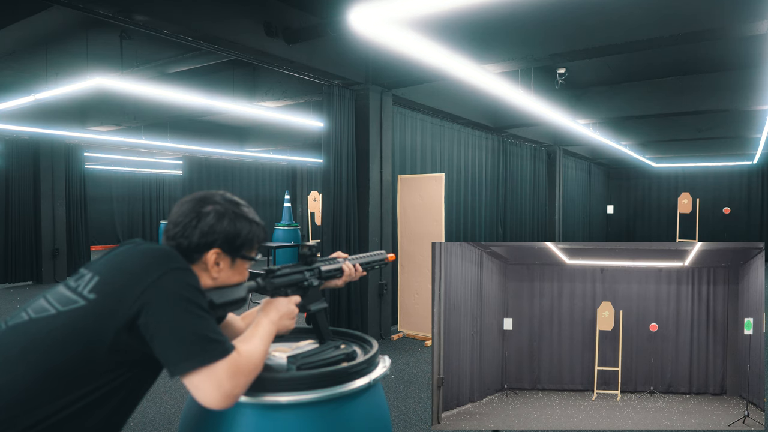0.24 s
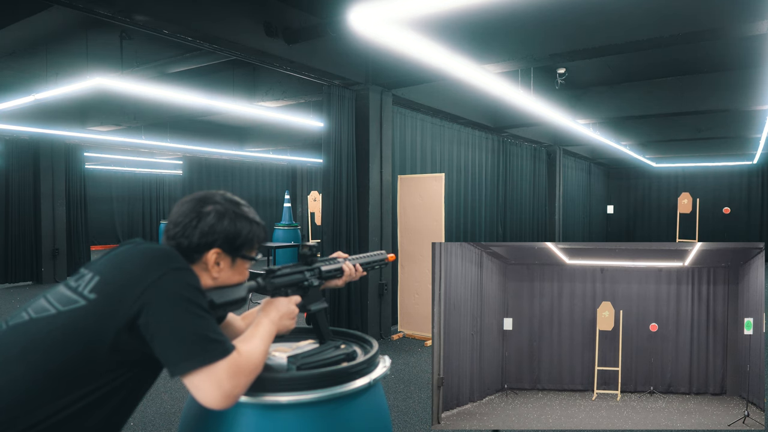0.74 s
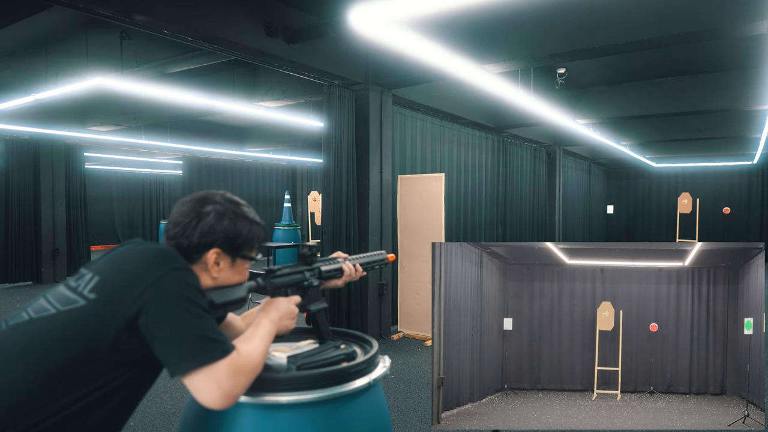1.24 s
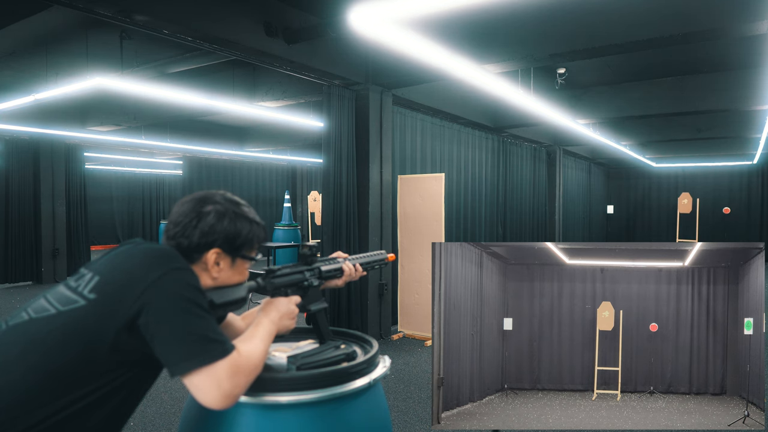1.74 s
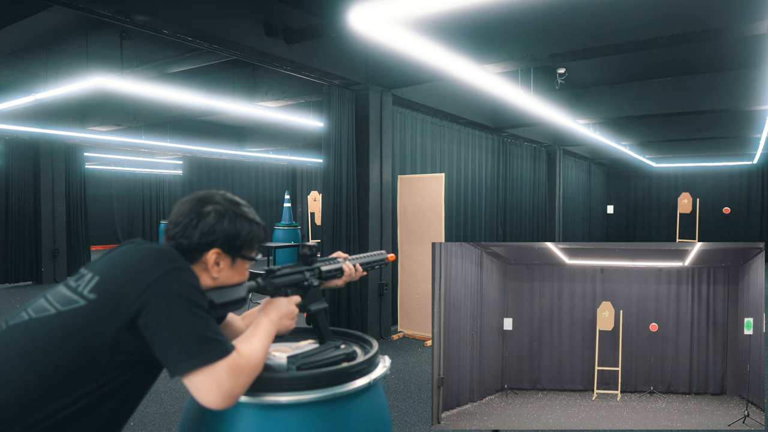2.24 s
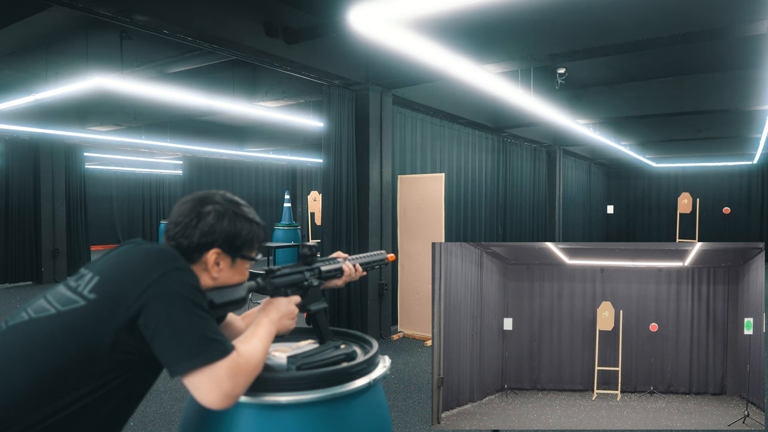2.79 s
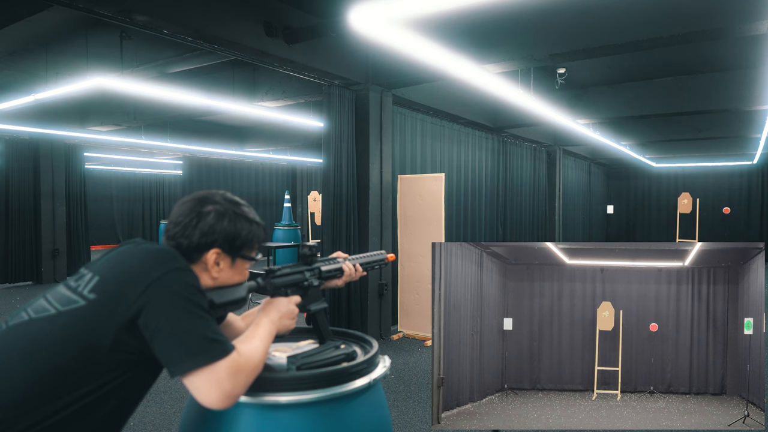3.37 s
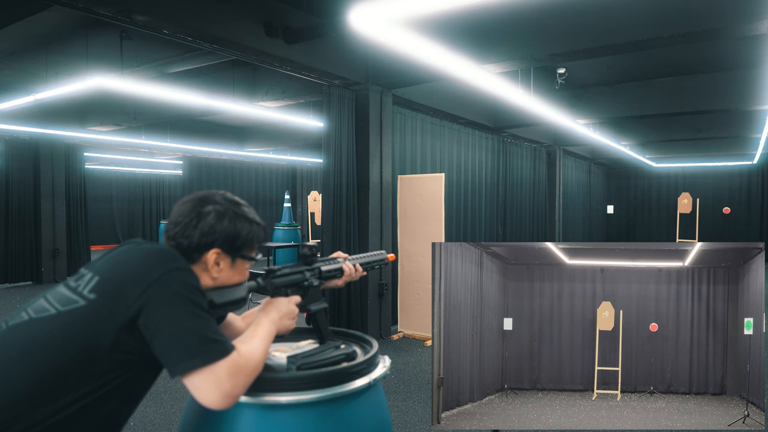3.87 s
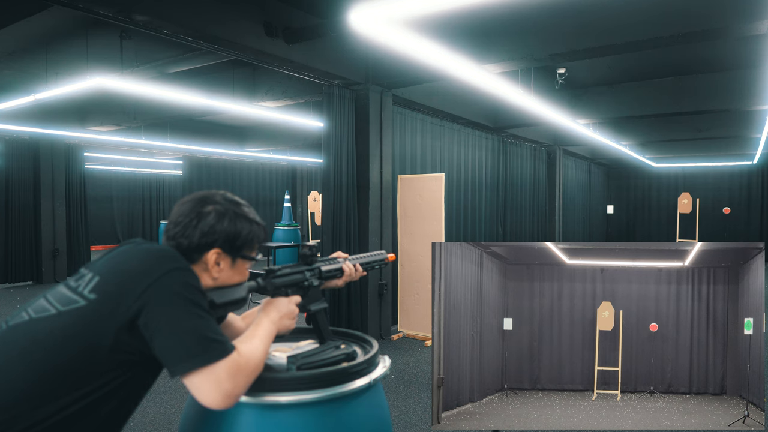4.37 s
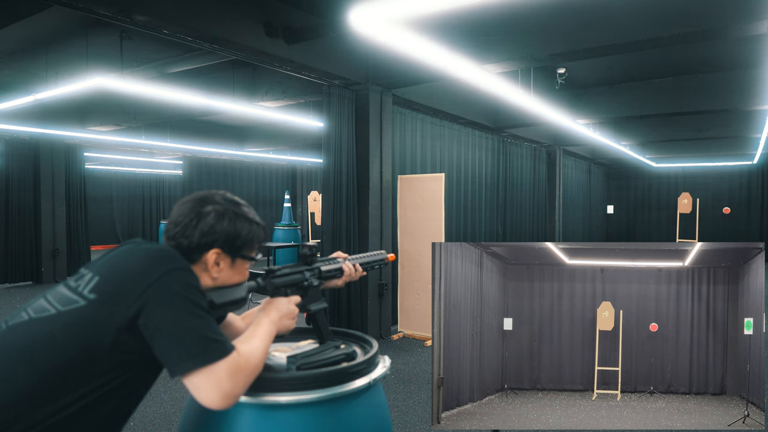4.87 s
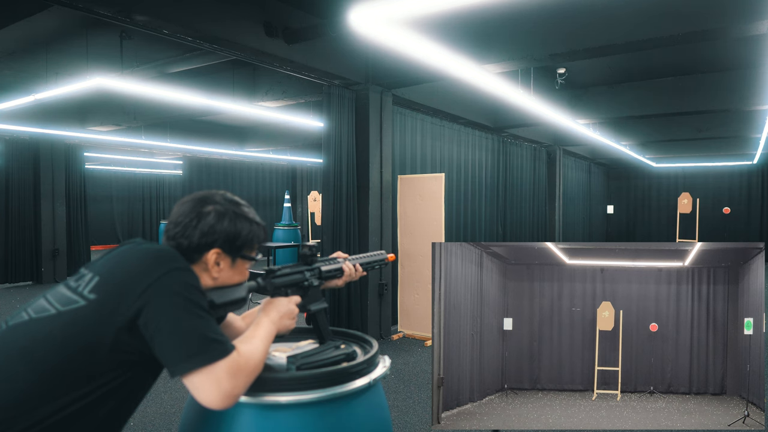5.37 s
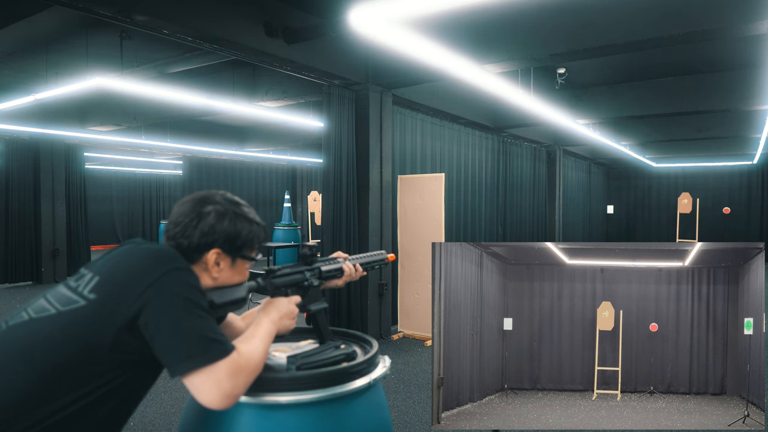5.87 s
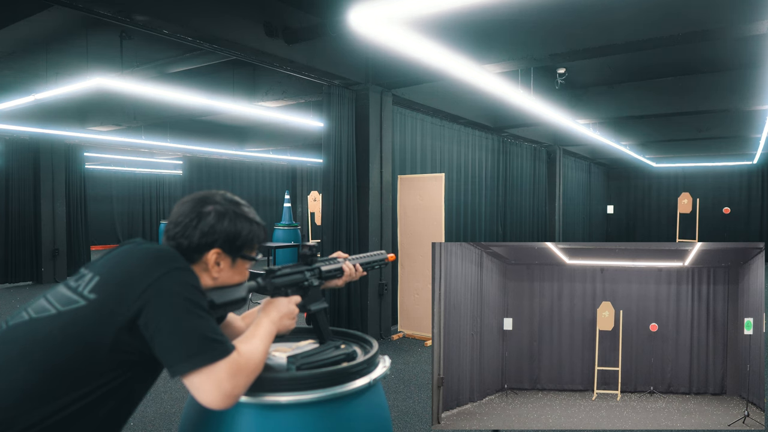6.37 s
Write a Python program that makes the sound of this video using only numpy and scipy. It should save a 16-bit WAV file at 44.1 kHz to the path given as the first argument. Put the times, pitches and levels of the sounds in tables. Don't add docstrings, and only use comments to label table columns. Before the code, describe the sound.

A gas-driven air rifle fires slow single shots in an indoor range, each clattering blast followed by a pellet smacking a board.

```python
import sys
import numpy as np
from scipy import signal
from scipy.fft import rfft, irfft, next_fast_len
from scipy.io import wavfile

SR = 44100
rng = np.random.default_rng(int(sys.argv[2]) if len(sys.argv) > 2 else 0)


def decibels_to_gain(level_db):
    exponent = np.asarray(level_db, float) / 20
    return 10 ** exponent


def unload_wav(signal):
    wavfile.write(
        sys.argv[1],
        SR,
        np.round(np.clip(np.atleast_2d(signal).T, -1, 1) * 32767).astype(np.int16),
    )


N = 292824
RING_SIZE = 49152
LEAD_S = .002


def evened(x):
    return x / np.sqrt(np.mean(x ** 2) + 1e-20)


def read(points, hz):
    f, value = np.transpose(points)
    return np.interp(np.log(hz + 1), np.log(f + 1), value)


def add(mix, s, sound):
    at = round(s * SR)
    sound = sound[..., max(-at, 0):]
    part = mix[..., max(at, 0):][..., :sound.shape[-1]]
    part += sound[..., :part.shape[-1]]


def stereo(pair):
    return np.array([pair[0] + pair[1], pair[0] - pair[1]])


def lowpassed_noise(shape, hz):
    return signal.lfilter(*signal.butter(2, hz, fs=SR), rng.standard_normal(shape))


def wander(size, hz):
    return evened(lowpassed_noise(size, hz))


def coloured(size, colour, side, tilt_db=0.):
    hz = np.fft.rfftfreq(size, 1 / SR)
    shape = decibels_to_gain(read(colour, hz) + tilt_db * np.log2((hz + 1) / 1500))
    mid, other = rfft(rng.standard_normal((2, size))) * shape
    return hz, np.array([mid, other * decibels_to_gain(read(side, hz))]) / np.std(irfft(mid, size))


# f/Hz, level/dB per Hz
AIR_COLOUR = [(12, -33), (20, -8.5), (81, -1.5), (163, -8.5), (241, -9), (318, -14), (445, -10), (484, -17),
              (589, -15), (640, -18), (1000, -19), (1220, -22), (3830, -29), (4920, -35.5), (15900, -44)]
# f/Hz, side minus mid/dB
AIR_SIDE = [(60, -24.5), (180, -20.5), (550, -17.5), (1650, -14.5), (4970, -24), (15000, -19)]


def ventilation():
    size = next_fast_len(N)
    air = stereo(irfft(coloured(size, AIR_COLOUR, AIR_SIDE)[1], size))[:, :N]
    return decibels_to_gain(-54.5 + 0.33 * wander(N, hz=1.8)) * air


def scrape(colour, db, rise, t60, size=16384):
    t = np.arange(size) / SR
    grain = stereo(irfft(coloured(size, colour, AIR_SIDE)[1], size))
    grain = grain * decibels_to_gain(2.5 * wander(size, hz=200))
    return grain * decibels_to_gain(db - 60 * t / t60) * (1 - np.exp(-t / rise))


# f/Hz, level/dB per Hz
RUSTLE_COLOUR = [(800, -30), (2500, -2), (5000, -7), (8000, -18), (12000, -41)]
# t/s, level/dB, rise/s, t60/s
RUSTLES = [
    (.70, -58, 0.011, 0.25),
    (1.17, -62, .02, 0.33),
    (2.59, -59, 0.005, 0.146),
    (4.436, -59, .008, 0.36),
    (6.537, -54.5, 0.0087, 0.22),
]


def rustles():
    out = np.zeros((2, N))
    for s, db, rise, t60 in RUSTLES:
        add(out, s, scrape(RUSTLE_COLOUR, db, rise, t60))
    return out


# f/Hz, level/dB, t60/s
HALL_MODES = [(75.6, -33, 1), (127.2, -28, 1.1), (159.6, -23, 0.77)]


def standing():
    t = np.arange(RING_SIZE) / SR
    out = 0
    for hz, db, t60 in HALL_MODES:
        level = decibels_to_gain(db + 1.5 * rng.standard_normal() - 60 * t / t60)
        out = out + level * (1 - np.exp(-t / 0.033)) * np.sin(2 * np.pi * (hz * t + rng.random()))
    return out


# f/Hz, t60/s
HALL_T60 = [(60, 1.5), (160, 1.36), (420, 0.64), (1100, 0.57), (2910, 0.47), (6000, 0.37), (9000, 0.33),
            (15500, .24)]
# f/Hz, level/dB
LATE_TAIL = [(60, -8), (300, -7.5), (1000, -13.5), (2500, -16.5), (5000, -7.5), (8500, -15), (15000, -26.5)]
# f/Hz, rate/dB per s
HELD_SAG = [(100, 3.5), (1000, 7), (5000, 23), (14000, 74)]
BANDS_HZ = np.geomspace(45, 16000, num=18)


def ringing(colour, side, rise, sag, hold, tilt_db, lasting=1.0):
    hz, z = coloured(RING_SIZE, colour, side, tilt_db)
    t, out = np.arange(RING_SIZE) / SR, 0
    place = np.interp(np.log(hz + 1), np.log(BANDS_HZ), np.arange(len(BANDS_HZ)))
    for k, centre in enumerate(BANDS_HZ):
        band = irfft(z * np.clip(1 - abs(place - k), 0, 1), RING_SIZE)
        fall_db = 60 * np.maximum(t - hold, 0) / read(HALL_T60, centre) / lasting
        fall = decibels_to_gain(-fall_db) + decibels_to_gain(read(LATE_TAIL, centre) - fall_db / 2.13)
        held = decibels_to_gain(-sag * read(HELD_SAG, centre) * np.minimum(t, hold))
        build_up = 1 - np.exp(-t / max(read(rise, centre), .001))
        out = out + band * fall * held * build_up
    out[1] *= decibels_to_gain(-9 * (1 - np.exp(-t / .15)))
    lumps = decibels_to_gain(2.0 * wander(RING_SIZE, hz=150) * np.exp(-t / .2))
    fade_out = np.minimum(np.arange(RING_SIZE, 0, -1) / 4000, 1)
    return stereo(out) * lumps * fade_out


def clack(widths, db, low_db, top_db, low_hz, high_hz, top_hz=10500., sharp=.0006, spread_db=-11., pure=1.5):
    t = np.arange(500) / SR
    late = (t - LEAD_S) / sharp
    blow = np.exp(-late ** 2 / np.where(late < 0, 1, 3))
    out = 0
    for hz, width, share_db in zip((low_hz, high_hz, top_hz), widths, (low_db, 0, top_db)):
        noise = lowpassed_noise((4, len(t)), width / 2)
        steady = pure * (width < 2000)
        waver = steady + evened(noise[:2]) + 1j * evened(noise[2:])
        pair = blow * (waver * np.exp(2j * np.pi * (hz * t + rng.random((2, 1))))).real
        out = out + decibels_to_gain(share_db) * pair / np.linalg.norm(pair, axis=1, keepdims=True)
    return decibels_to_gain(db) * stereo(out * decibels_to_gain([[0], [spread_db]])) / abs(signal.hilbert(out[0])).max()


BOARD_WIDTHS_HZ = (700, 1800, 5000)
# t/s, level/dB, f/Hz
GRAZES = [
    (3.7885, -3, 4180),
    (5.6036, -1.5, 4445),
]
GRAZE_BOUNCE = 0.0049, -8


def grazes():
    out = np.zeros((2, N))
    for s, db, hz in GRAZES:
        for delay, drop_db in ((0, 0), GRAZE_BOUNCE):
            touch = clack(BOARD_WIDTHS_HZ, db + drop_db, low_db=-7.5, top_db=-13.5, low_hz=1770.0,
                          high_hz=hz, top_hz=7500., sharp=.0011, spread_db=-15., pure=.8)
            add(out, s + delay - LEAD_S, touch)
    return out


def snap(db, bright):
    push_s, blur_s, echo_s, echo_db = .00016 / bright ** 2.5, .00013 / bright, .0011, -3
    t = np.arange(400) / SR
    wave = np.where(t < push_s, 1., -np.exp(-(t - push_s) / (0.98 * push_s)))
    bounce = np.convolve(wave, t * np.exp(-t / blur_s))[:len(t)]
    late = np.pad(bounce / abs(bounce).max(), (round(echo_s * SR) - 8, 0))
    both = np.pad(wave, (0, len(late) - len(t))) + decibels_to_gain(echo_db) * late
    band_hz = [600. * bright, 5500. * bright ** 2.5]
    return decibels_to_gain(db + 2.5) * signal.sosfilt(signal.butter(1, band_hz, "band", fs=SR, output="sos"), both)


def boom(db, peak):
    start_hz, end_hz, fall_s, width_hz = 1050., 400., .045, 380.
    t = np.arange(8192) / SR
    hz = end_hz + (start_hz - end_hz) * np.exp(-t / fall_s)
    turn = np.exp(2j * np.pi * np.cumsum(hz) / SR)
    slow = lowpassed_noise((2, len(t)), width_hz / 2)
    tone = evened((turn * (slow[0] + 1j * slow[1])).real)
    return decibels_to_gain(db) * tone * t / peak * np.exp(1 - t / peak)


# t/s, level/dB, board ring/dB
KNOCKS = [(.004, -10.5, 5), (.008, -3, 0), (.012, -6.5, 0), (0.018, -8, 4.5), (0.025, -12, 4.5),
          (0.035, -7.5, 7), (0.037, -11, 6), (0.048, -16, 5), (0.056, -18, 7), (.06, -24, 7)]
SCATTER = .0004, 1.5, 2.5, .07, .04
BOARD_HZ, BOARD_SAG_OCT_PER_S, SURFACE_HZ = 1414, 11, 3870


def knocks(s, tilt_db, bright):
    out = np.zeros((2, N))
    for delay, peak_db, ring_db in KNOCKS:
        ds, d_db, d_ring, d_low, d_high = rng.uniform(-1.1, 1, size=5) * SCATTER
        low_hz = BOARD_HZ * bright * 2 ** (d_low - BOARD_SAG_OCT_PER_S * delay)
        high_hz = SURFACE_HZ / bright ** .6 * 2 ** (2 * d_high)
        knock = clack(BOARD_WIDTHS_HZ, peak_db + d_db + 0.5 * tilt_db, ring_db + d_ring - 2.5 * tilt_db,
                      -9, low_hz, high_hz, top_hz=8420.0, sharp=.001, spread_db=-18.0, pure=0.71)
        add(out, s + delay + ds - LEAD_S, knock)
    return out


# t/s, snap peak/dB, reverberant level/dB, boom/dB, brightness/dB per octave
STRIKES = [
    (0.0295, 2, -18, -24.5, 0.48),
    (1.9491, 2, -15.5, -20, 0.7),
    (3.8010, 0.5, -17, -40.5, 0.3),
    (5.612, -4, -19.5, -24, -1),
]
# f/Hz, level/dB per Hz
SMACK_COLOUR = [(18, -38.5), (30, -19.5), (260, -4), (390, -1), (540, 0), (960, -2.5), (1300, -5),
                (2100, -6), (4500, -10), (6200, -14), (8500, -20), (12000, -23.5), (15900, -30)]
# f/Hz, side minus mid/dB
SMACK_SIDE = [(60, -13.5), (180, -28.5), (550, -20.5), (1650, -7), (4970, -12.5), (15000, -2.5)]
# f/Hz, rise/s
SMACK_RISE = [(60, .04), (300, .04), (600, .015), (1500, .003), (16000, .003)]
# f/Hz, level/dB per Hz
BLOOM_COLOUR = [(200, -26), (400, -1), (800, 1.5), (1300, -8), (2200, -33.5), (6000, -70)]
FAR_WALL = .1, -42
# f/Hz, level/dB per Hz
FAR_WALL_COLOUR = [(1500, -30), (5000, -4), (8000, 0), (12000, -5), (16000, -11)]
BRIGHT_OCT_PER_DB = .35
CHIP_DB, CHIP_HZ, SPLIT_DB_PER_DB = -14.5, 5500., 9.


def target():
    out = grazes()
    far_delay, far_db = FAR_WALL
    for s, snap_db, hall_db, boom_db, tilt_db in STRIKES:
        bright = 2 ** (BRIGHT_OCT_PER_DB * tilt_db)
        add(out, s, snap(snap_db, bright)[None])
        for delay in (.0003, .0013):
            chirp = clack(BOARD_WIDTHS_HZ, CHIP_DB - SPLIT_DB_PER_DB * tilt_db, low_db=-21.0,
                          top_db=-13.5, low_hz=1500., high_hz=CHIP_HZ, sharp=0.00053)
            add(out, s + delay - LEAD_S, chirp)
        add(out, s, boom(boom_db, peak=0.024 / bright ** 0.59)[None])
        add(out, s, scrape(BLOOM_COLOUR, -34.5 - 7. * tilt_db, rise=.03, t60=0.75))
        far = scrape(FAR_WALL_COLOUR, far_db - 2 + 6 * tilt_db, rise=.0005, t60=.06)
        add(out, s + far_delay, far)
        hall = ringing(SMACK_COLOUR, SMACK_SIDE, SMACK_RISE, sag=0.5, hold=0.0032,
                       tilt_db=0.61 * tilt_db, lasting=0.82)
        add(out, s, decibels_to_gain(hall_db) * hall)
        out += knocks(s, tilt_db, bright)
    return out


# t/s, level/dB, receiver ring/dB, stock thud/dB
TICKS = [
    (1.6253, -48.5, -9, -52.5),
    (1.673, -33.5, 6.5, -47.5),
    (3.532, -42.5, 2.5, -51),
    (5.317, -40.5, 2, -47),
]
# f/Hz, level/dB per Hz
THUD_COLOUR = [(120, -24), (350, 6), (600, -1.5), (1200, -12.5), (4000, -22.5), (7000, -43.5)]


def trigger():
    out = np.zeros((2, N))
    for s, db, ring_db, thud_db in TICKS:
        tick = clack((1900, 1900, 8000), db, ring_db, top_db=-33., low_hz=2000., high_hz=4200.,
                     sharp=.0013, spread_db=-22.0, pure=.2)
        add(out, s - LEAD_S, tick)
        add(out, s, scrape(THUD_COLOUR, thud_db + 2.5, rise=0.008, t60=.3))
    return out


def recoil(db, delay, hz, length):
    t = np.arange(6000) / SR - delay
    return decibels_to_gain(db) * np.array([[1], [-.4]]) * np.sin(2 * np.pi * hz * t) * np.exp(-(t / length) ** 2)


# t/s, level/dB, receiver ring/dB, barrel f/Hz
CYCLE = [(.0096, 5, -5.5, 3024), (0.0148, 1.5, -6, 4294), (0.0242, 2.5, -6, 4300),
         (0.0314, -6, -12.5, 4750), (.046, -1.5, -9, 5286), (.0528, 2.5, -12, 4945), (.059, -7.5, -2, 3870),
         (0.079, -2, -7, 4520), (.102, -5, -1.5, 4300), (0.1105, -8.5, -4.5, 4450), (.1185, -8, 0, 4550),
         (.126, -11, -0.5, 4200), (.136, -3.5, -2.5, 4200), (.148, -11.5, 0, 4350), (.158, -13, -1.1, 4074)]
GUN_WIDTHS_HZ = (900, 1600, 8000)
RECEIVER_HZ, RECEIVER_SAG_OCT_PER_S = 1636, .4
GUN_HISS_DB, GUN_HISS_DB_PER_S = -9.5, -30.


def bolt(s):
    out = np.zeros((2, N))
    for delay, peak_db, ring_db, barrel_hz in CYCLE:
        ds, d_db, d_ring, d_low, d_high = rng.uniform(-1, 1, size=5) * SCATTER
        hiss_db = GUN_HISS_DB + GUN_HISS_DB_PER_S * delay
        receiver_hz = RECEIVER_HZ * 2 ** (d_low - RECEIVER_SAG_OCT_PER_S * delay)
        blow = clack(GUN_WIDTHS_HZ, peak_db + d_db, ring_db + d_ring + 2.5, hiss_db,
                     receiver_hz, barrel_hz * 2 ** d_high, sharp=0.0012, pure=0.47)
        add(out, s + delay + ds - LEAD_S, blow)
    return out


# t/s, roar/dB, hold by moving bolt and recovering limiter/s, brightness/dB per octave
SHOTS = [
    (-.208, -15, .14, 0),
    (1.711, -13.5, 0.13, 0.8),
    (3.562, -13, 0.11, 0.52),
    (5.368, -13.5, .14, 0.7),
]
# f/Hz, level/dB per Hz
ROAR_COLOUR = [(18, -45.5), (30, -23.5), (86, -22.5), (127, -2), (425, -4), (472, -1.5), (614, -2.5),
               (1390, -3), (1620, -1), (1850, -5.5), (2890, -6), (4180, 0.5), (9180, -12.5), (14300, -18),
               (15900, -28.5)]
# f/Hz, side minus mid/dB
ROAR_SIDE = [(60, -7.5), (180, -23), (550, -11.5), (1650, -7), (4970, -12.5), (15000, 0)]
# f/Hz, rise/s
ROAR_RISE = [(60, 0.025), (250, 0.017), (1000, 0.01), (4000, 0.0031), (16000, 0.0031)]
# f/Hz, level/dB per Hz
LEAK_COLOUR = [(100, -36.5), (500, -2), (1600, -4), (2800, -7), (4300, -6.5), (9000, -12.5), (15900, -24)]


def rifle():
    out = trigger()
    for s, db, hold, tilt_db in SHOTS:
        roar = ringing(ROAR_COLOUR, ROAR_SIDE, ROAR_RISE, sag=1., hold=hold, tilt_db=tilt_db)
        t = np.arange(RING_SIZE) / SR
        ducked = decibels_to_gain(-5. * np.exp(-((t - .025) / 0.055) ** 2))
        add(out, s, decibels_to_gain(db) * roar * ducked + standing())
        add(out, s, recoil(db=-36., delay=.04, hz=45., length=.015))
        add(out, s, recoil(db=-23., delay=.062, hz=120., length=.003))
        add(out, s, scrape(LEAK_COLOUR, db=-11.5, rise=.009, t60=.2))
        out += bolt(s)
    return out


def scene():
    return ventilation() + rustles() + target() + rifle()


def low_pass(x):
    return signal.sosfilt(signal.butter(12, 15800, fs=SR, output="sos"), x)


def record(dry):
    mid, side = stereo(np.clip(dry, -1, 1)) / 2
    t = np.arange(N) / SR
    for s, *_ in SHOTS + STRIKES:
        side = side * np.clip(abs(t - s - .012) / .006 - 2, .03, 1)
    return low_pass(stereo([mid, side]))


dry = scene()
out = record(dry)
unload_wav(out)
```